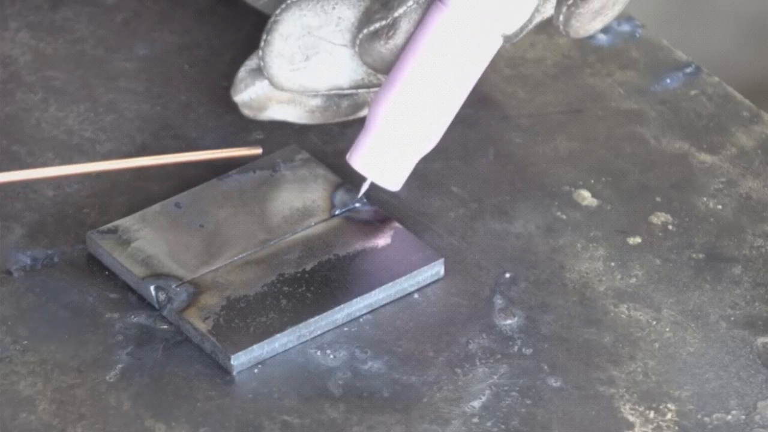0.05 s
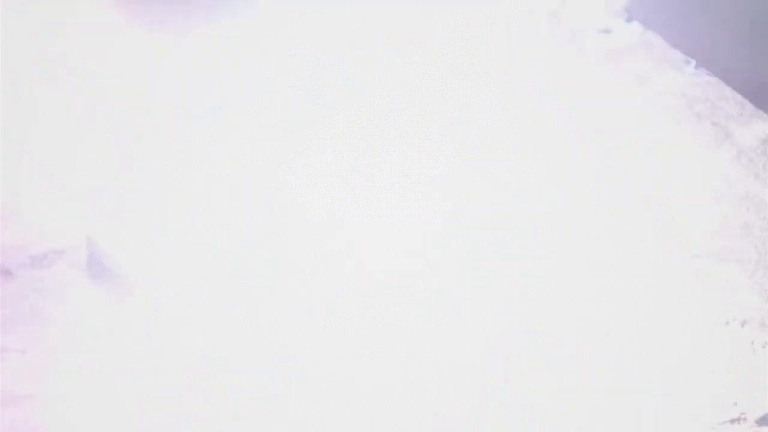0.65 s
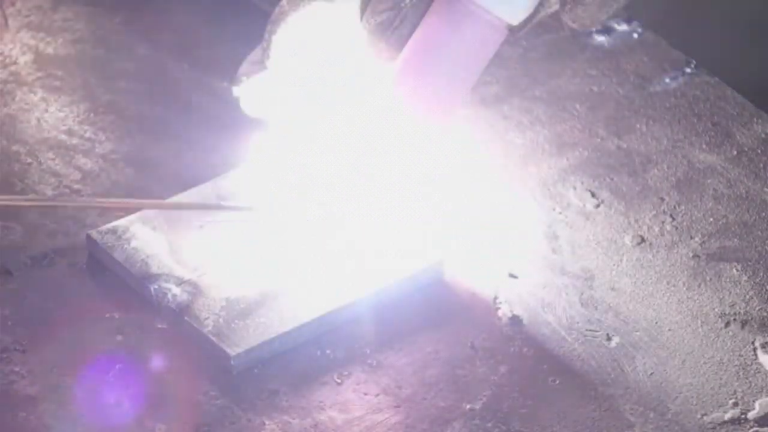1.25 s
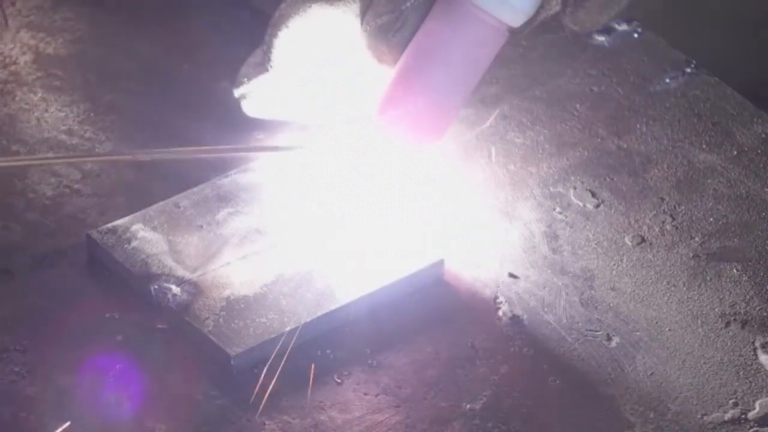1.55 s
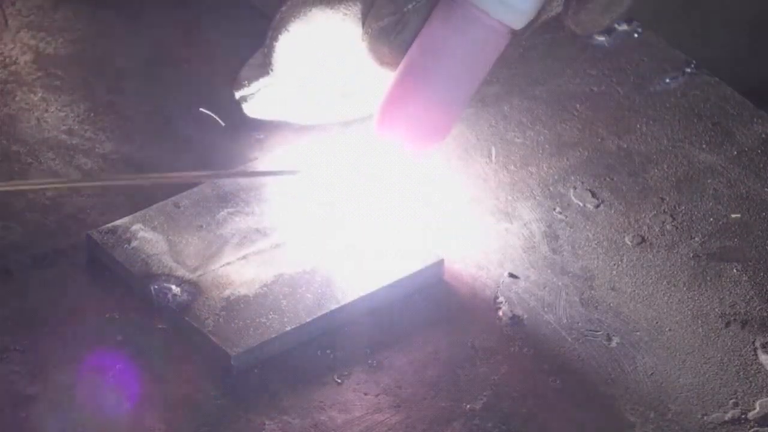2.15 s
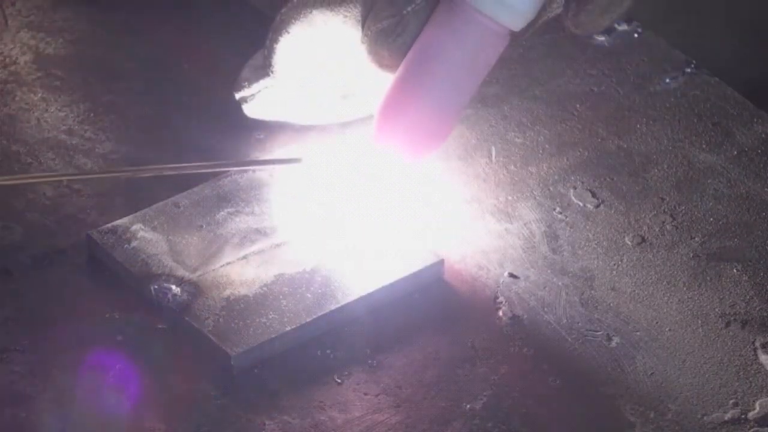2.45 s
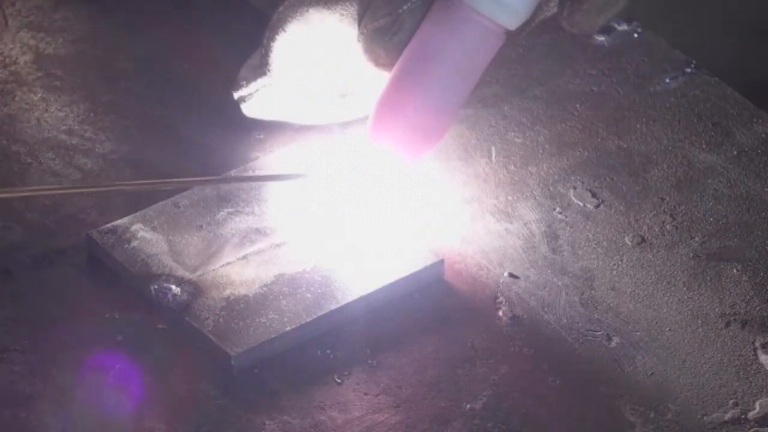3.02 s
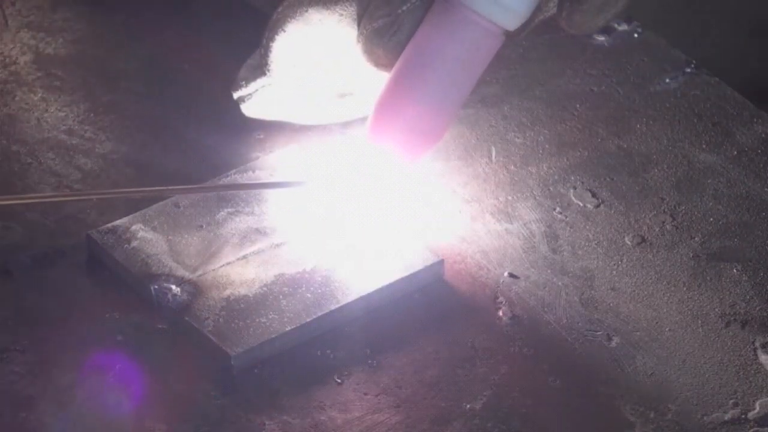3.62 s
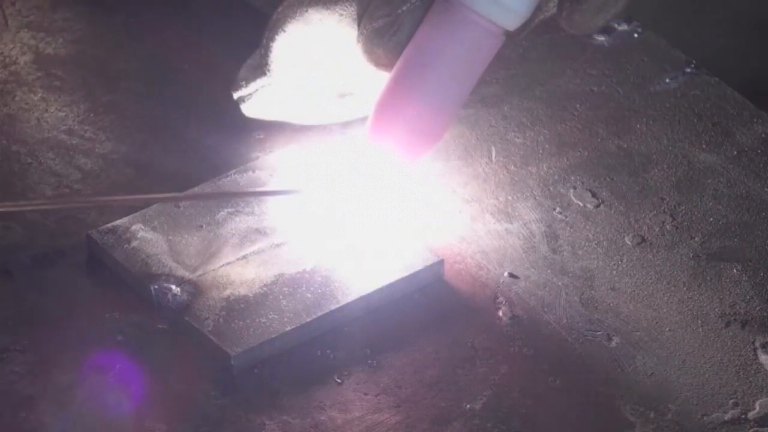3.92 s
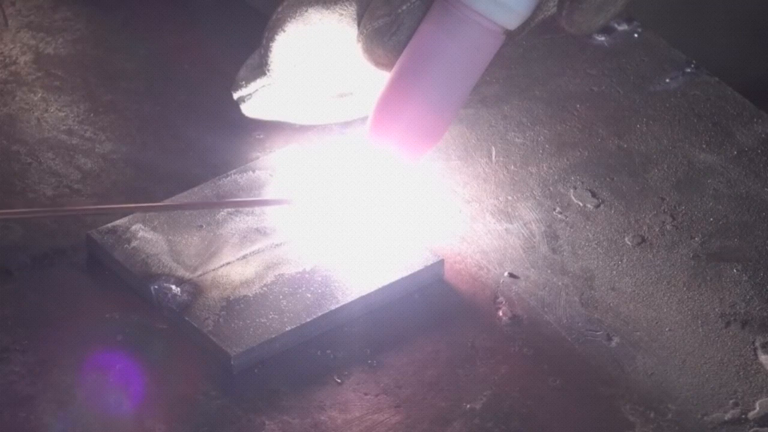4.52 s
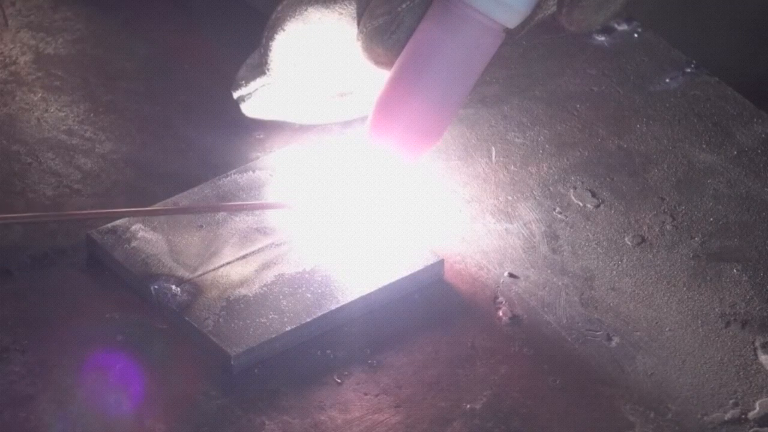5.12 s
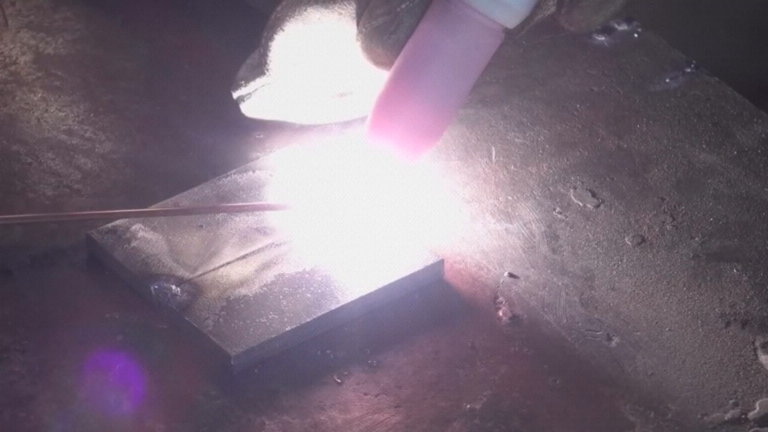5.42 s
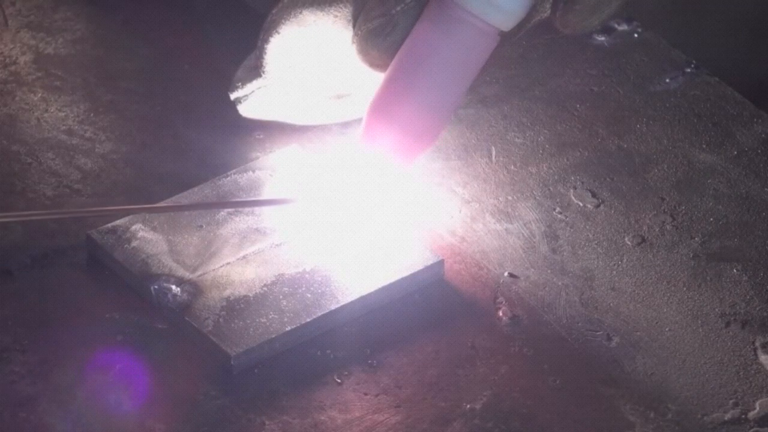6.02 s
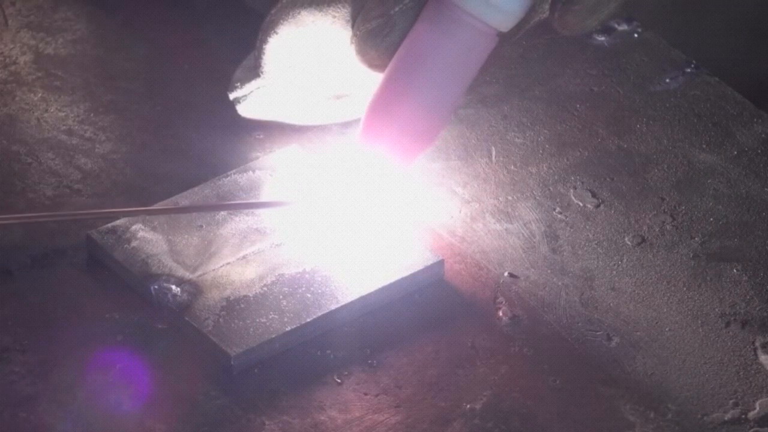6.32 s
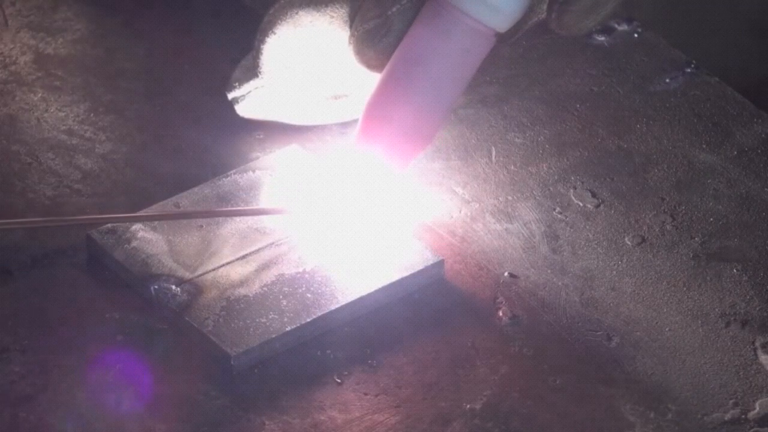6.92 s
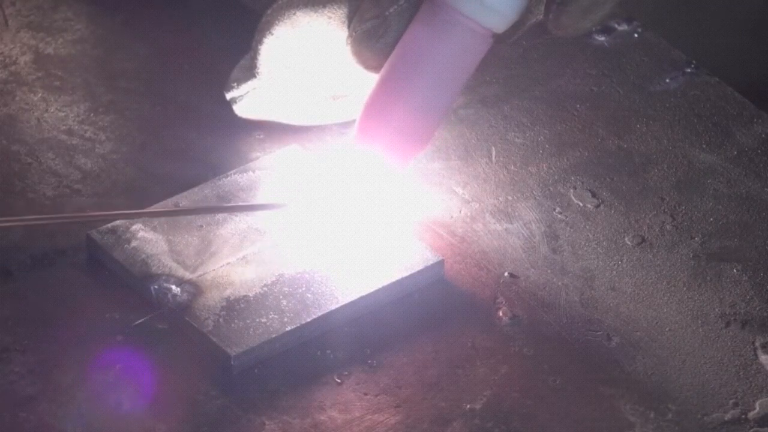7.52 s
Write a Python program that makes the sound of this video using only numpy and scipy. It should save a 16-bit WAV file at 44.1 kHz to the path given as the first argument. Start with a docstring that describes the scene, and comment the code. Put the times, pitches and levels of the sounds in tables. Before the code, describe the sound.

Gas hisses from a welding torch, close to the microphone in a workshop. Two quick, sharp sparks snap and the arc lights on a steel plate with a loud, high, slightly buzzing whine. The melting metal sizzles and spits for a moment. The whine then eases to a steady tone over the continuing hiss, with a few small pops later. The sound is thin and bright, with almost no bass.

```python
"""TIG welding on a steel plate

Shielding gas hisses from the nozzle, close to a microphone that passes almost no bass.
Two sparks snap and the arc lights, singing with the ripple of its power supply. The metal sizzles
and spits while the pool melts, then the arc settles into a steady whine over the hiss."""
import sys
import numpy as np
from scipy import signal
from scipy.fft import rfft, irfft
from scipy.io import wavfile
from scipy.ndimage import uniform_filter1d, minimum_filter1d

SR = 44100
rng = np.random.default_rng(int(sys.argv[2]) if len(sys.argv) > 2 else 0)


def materialize(psi):
    """Save the field psi as 16-bit PCM at rate SR to the path in sys.argv[1].

    A 1-D psi becomes a single channel; in a 2-D psi each row is a channel.
    """
    bounded = np.clip(np.atleast_2d(psi).T, -1, 1)
    quanta = np.round(bounded * 32767).astype(np.int16)
    wavfile.write(sys.argv[1], SR, quanta)


N = 342216
T = np.arange(N) / SR
LIT_S, HARD_UNTIL_S, SETTLE_S, MELTED_S = 0.455, 0.83, 0.73, 1.6

CLOCK_HZ, REST_HZ, RIPPLE_HZ = 6960, 2504, 110
# Each law: settled level in dB, extra dB while the arc burns hard, creep in dB per second.
WHINE_LAW, UPPER_LAW, LOWER_LAW = (-16.5, 7.2, 0), (-27, 8.2, 0.58), (-33.5, -2.5, 0.33)
# The whine drifts with arc length. Each row: time in seconds, pitch in Hz.
WHINE_PITCH = [(0.49, 2496), (0.57, 2526), (1.05, 2514), (2.64, 2497), (3.84, 2505), (6.27, 2504),
               (6.56, 2495), (7.7, 2496)]
# Faint tones of the supply. Each row: frequency at rest in Hz, Hz moved per Hz of whine drift,
# level against the whine in dB, extra dB while the arc burns hard.
SUPPLY_TONES = [(1252, .5, -37, 0), (3456, 0, -26, 0), (5004, 2, -24.5, -8), (5708, -.5, -29, -5),
                (9055, -2.5, -43, 9), (9464, 1, -31.5, 0), (10440, 4.5, -46, 0), (11416, -1, -43, 0),
                (13610, -5, -45, -3)]


def arc_whine(swell_db=21, swell_s=0.078, jitter_hz=5, tremor_hz=3, mix_settle_s=0.38):
    """The arc is a loudspeaker for its current: a whine and difference tones with the switching clock."""
    onset_db = -swell_db * np.clip(1 - (T - LIT_S) / swell_s, 0, 1)
    hand_sway_db = 0.5 * wander(3.5)
    _, dip_db = flares(T)
    shared_db = onset_db - dip_db + hand_sway_db
    level_db = settling(WHINE_LAW, T) + shared_db
    drift_hz = curve(WHINE_PITCH, T) - REST_HZ + jitter_hz * wander(39.2) + tremor_hz * wander(6.16)
    drift_turns = np.cumsum(drift_hz) / SR
    turns = REST_HZ * T + drift_turns
    # Ripple swings loudness and pitch together, so the upper sideband is the stronger.
    ripple = np.exp(2j * np.pi * RIPPLE_HZ * T)
    throb = 1 + amp(-12.5) * ripple + amp(-28) / ripple
    out = amp(level_db + 0.34 * wander(40)) * (throb * np.exp(2j * np.pi * turns)).real
    for harmonic, law, flutter_db, flutter_hz in (1, UPPER_LAW, 1.35, 90), (2, LOWER_LAW, 2.1, 49):
        mix_db = settling(law, T, mix_settle_s) + shared_db + flutter_db * wander(flutter_hz)
        out += amp(mix_db) * np.sin(2 * np.pi * (CLOCK_HZ * T - harmonic * turns))
    for rest_hz, slope, db, hard_db in SUPPLY_TONES:
        tone = np.sin(2 * np.pi * (rest_hz * T + slope * drift_turns + rng.random()))
        out += amp(level_db + db + hard_db * hardness(T)) * tone
    fade_in = np.clip((T - LIT_S) / 0.017, 0, 1)
    return np.sqrt(2) * out * fade_in


def hardness(t, settle_s=SETTLE_S):
    """One while the arc burns hard on the cold plate, relaxing to zero as the pool forms."""
    return np.exp(-np.maximum(t - HARD_UNTIL_S, 0) / settle_s)


def settling(law, t, settle_s=SETTLE_S):
    """A level in dB that follows the hardness of the arc and creeps as the plate heats."""
    settled_db, hard_db, db_per_s = law
    return settled_db + hard_db * hardness(t, settle_s) + db_per_s * t


# Each row: centre in seconds, half length in seconds, extra boil in dB, whine dip in dB (negative lifts).
POOL_FLARES = [(0.655, 0.038, 4.5, 2), (1.0, .03, 2, 0.5), (1.293, 0.072, 4.5, -0.5),
               (1.436, 0.057, 6, 2.5), (1.533, 0.068, 3, -1), (1.67, 0.024, 2.5, 3.5), (1.765, 0.015, 0, 6),
               (1.86, 0.077, 5, 0), (1.998, 0.015, 6, -2), (2.097, 0.061, 3.7, 0.5)]


def flares(t):
    """The melting pool flares up, sizzling and robbing the whine: extra boil and whine dip in dB."""
    centre_s, half_s, boil_db, dip_db = np.transpose(POOL_FLARES)
    bumps = np.exp(-((t[..., None] - centre_s) / half_s) ** 2)
    return bumps @ boil_db, bumps @ dip_db


# Hiss spectrum, and what cold gas or a hard arc adds. Each row: frequency in Hz, relative level in dB.
HISS_COLOUR = [(420, -83), (540, -60), (660, -36.5), (1050, -36), (1350, -20.5), (1900, -17.0), (2700, -1),
               (3500, 0.0), (5000, -4), (6500, -8.5), (8500, -29.5), (9500, -28.5), (15500, -35.5)]
COLD_COLOUR = [(600, -6), (1300, -6.5), (2000, 0.5), (2800, -0.5), (4000, 0), (8000, -4.5), (12000, -0.5),
               (15000, -6)]
FIZZ_COLOUR = [(1500, 1), (5000, -1), (8500, 0.5), (10500, 1.5), (15000, 4)]
# Resonances of the nozzle and its gap to the plate: throughout, before the arc lights, and after.
# Each row: centre in Hz, width in Hz, gain in dB.
NOZZLE_PEAKS = [(805, 46, 2), (4170, 73, -6), (4907, 81, 4.5), (5090, 98, -6.5), (5740, 390, 3),
                (7573, 140, -12.5), (8400, 767, 22.5), (8860, 301, -16), (10000, 190, -5.5),
                (11760, 180, 7), (12853, 105, -23), (13400, 150, 9)]
COLD_PEAKS = [(2680, 60, 4), (3450, 110, -4), (3430, 23, 15), (3650, 43, 8), (3900, 76, 5), (4800, 74, 4),
              (10700, 200, -2)]
HOT_PEAKS = [(3210, 80, 2), (4100, 33, 1), (4810, 26, 4.5), (5660, 33, 3.5), (7000, 98, -5),
             (11680, 69, -8), (11160, 220, -2.5)]
# Resonances rise as the torch warms and moves. Each row: time in seconds, frequency factor.
WARMING_SHIFT = [(0, 0.98), (1.6, 1.004), (2.7, 1.016), (5, 1.02), (7.76, 1.021)]
# Sizzle of the pool. Each row: frequency in Hz, lift in dB per dB of boil.
BOIL_LIFT = [(700, 0.72), (1500, 1.21), (3500, 0.95), (5500, 0.03), (8300, -0.18), (10000, 1.42),
             (15000, -0.1)]


def gas_hiss(calm_boil_db=4.0, sputter_db=0.73, sputter_per_boil=0.11, swell_db=0.77):
    """Turbulent gas through the nozzle's resonances; the boiling pool thickens it and makes it sputter."""
    t = np.arange(N // 256 + 5)[:, None] * 256 / SR
    hz = np.fft.rfftfreq(1024, 1 / SR)
    level_db, boil_db = gas_levels(t)
    shifted_hz = hz / curve(WARMING_SHIFT, t)
    nozzle_db = spectrum(HISS_COLOUR, shifted_hz) + peaks(NOZZLE_PEAKS, shifted_hz)
    sizzle_db = (boil_db - calm_boil_db) * spectrum(BOIL_LIFT, hz)
    cold_db = spectrum(COLD_COLOUR, hz) + peaks(COLD_PEAKS, hz)
    hot_db = peaks(HOT_PEAKS, shifted_hz) + hardness(t) * spectrum(FIZZ_COLOUR, hz)
    gain = amp(nozzle_db + sizzle_db + np.where(t < LIT_S, cold_db, hot_db))
    level_band = (hz > 5200) & (hz < 8700)
    gain *= amp(level_db) / np.linalg.norm(gain[:, level_band], axis=1, keepdims=True)
    spectra = gain * (rng.standard_normal(gain.shape) + 1j * rng.standard_normal(gain.shape))
    hiss = signal.istft(spectra.T, nperseg=1024, noverlap=768)[1][:N]
    excess_boil_db = np.maximum(gas_levels(T)[1] - calm_boil_db, 0) * (T > LIT_S)
    depth_db = sputter_db + sputter_per_boil * excess_boil_db
    hiss *= amp(depth_db * wander(93) + swell_db * wander(37))
    bass_cut = signal.butter(6, 480, "highpass", fs=SR, output="sos")
    return signal.sosfilt(bass_cut, hiss)


# Each law: settled level in dB, extra dB while the arc burns hard, creep in dB per second.
HISS_LAW, BOIL_LAW = (-24.5, -1.34, 0.19), (5.32, 3.2, -0.25)


def gas_levels(t, cold_hiss_db=-26, cold_boil_db=1, sag_s=0.587, sag_db=4.9, fall_s=0.065, rise_s=0.17):
    """Hiss level and boil (strength of the sizzle) in dB; the hiss sags once as the whine comes in."""
    sag = np.where(t < sag_s, np.exp(-((t - sag_s) / fall_s) ** 2), np.exp(-abs(t - sag_s) / rise_s))
    hiss_db = np.where(t < LIT_S, cold_hiss_db, settling(HISS_LAW, t) - sag_db * sag)
    boil_db = np.where(t < LIT_S, cold_boil_db, settling(BOIL_LAW, t) + flares(t)[0])
    return hiss_db, boil_db


# Each row: start in seconds, level in dB, decay in seconds.
IGNITION_SPARKS = [(0.4365, 0.5, 0.001), (0.4423, -3.5, 0.0031)]
# Each row: frequency in Hz, relative level in dB.
SNAP_COLOUR = [(300, -35), (700, -38.5), (1800, -18.5), (3600, -3.5), (6000, -11), (9000, -14),
               (15500, -18.5)]


def sparks():
    """High-voltage snaps jump the gap before the arc holds, loud enough to overload the microphone."""
    envelope = sum(amp(db) * burst(start_s, decay_s) for start_s, db, decay_s in IGNITION_SPARKS)
    return np.clip(colour(rng.standard_normal(N) * envelope, SNAP_COLOUR), -1, 1)


# Each row: start in seconds, relative level in dB.
POOL_SPITS = [(1.3763, -18), (1.4714, -25), (1.5194, -24), (1.6054, -22), (2.05, -16), (5.1212, -25),
              (5.4071, -24), (5.453, -24), (5.5593, -29), (6.4284, -34), (6.8174, -22), (7.1038, -26)]


def spits(pop_db=13, tick_db=-4, decay_s=0.00043, bubbles_per_s=60, crackle_db=3):
    """Bubbles burst in the pool: a few loud pops with a bright tick, and fine crackle while it boils."""
    pop_colour = [(400, -85), (800, -37), (1800, -24), (3600, 11.5), (7000, -25), (15000, -32)]
    tick_colour = [(500, -80), (6000, -12), (10000, 8), (15000, -4)]
    bursts = sum(amp(db) * burst(start_s, decay_s) for start_s, db in POOL_SPITS)
    level_db, boil_db = gas_levels(T)
    bubbles = (rng.random(N) < bubbles_per_s / SR) * (T > MELTED_S) * rng.uniform(-1, 1, N)
    crackle = bubbles * amp(level_db + boil_db + crackle_db)
    pops = amp(pop_db) * bursts * rng.standard_normal(N)
    ticks = amp(tick_db) * bursts * rng.standard_normal(N)
    return colour(pops + crackle, pop_colour) + colour(ticks, tick_colour)


def bench_echoes(x, echo_db=-22):
    """Weak echoes from the bench and nearby surfaces put a fine ripple on the spectrum."""
    delays_s = [.0038, .0072, .0109, .0137, .0151]
    return x + amp(echo_db) * sum(np.pad(x, (round(s * SR), 0))[:N] for s in delays_s)


def amp(db):
    """Decibels to gain."""
    return 10 ** (np.asarray(db) / 20)


def unit(x):
    """Scales to an rms of one."""
    return x / np.sqrt(np.mean(x ** 2) + 1e-20)


def curve(rows, t):
    """Interpolates (seconds, value) rows at the times t."""
    return np.interp(t, *np.transpose(rows))


def spectrum(points, hz):
    """Interpolates (Hz, value) points on a log-frequency axis."""
    point_hz, value = np.transpose(points)
    return np.interp(np.log(hz + 1), np.log(point_hz), value)


def peaks(rows, hz):
    """Bell-shaped peaks and notches, in dB."""
    return sum(db * np.exp(-.5 * ((hz - centre_hz) / width_hz) ** 2) for centre_hz, width_hz, db in rows)


def wander(top_hz):
    """Random motion of rms one, rolling off above top_hz."""
    hz = np.fft.rfftfreq(N, 1 / SR)
    return unit(irfft(rfft(rng.standard_normal(N)) / (1 + (hz / top_hz) ** 2), N))


def colour(x, points):
    """Filters by (Hz, dB) points, keeping the power of white noise."""
    gain = unit(amp(spectrum(points, np.fft.rfftfreq(N, 1 / SR))))
    return irfft(rfft(x) * gain, N)


def burst(start_s, decay_s):
    """Envelope that jumps up and dies away."""
    return (T >= start_s) * np.exp(-np.maximum(T - start_s, 0) / decay_s)


def scene(dip_db=-7):
    """Hiss, spits, sparks and whine; the hiss dips briefly from the first spark until the arc lights."""
    igniting = (T > IGNITION_SPARKS[0][0]) & (T < LIT_S)
    hiss = gas_hiss() * amp(dip_db * uniform_filter1d(igniting * 1., size=60))
    return bench_echoes(hiss + spits()) + sparks() + arc_whine()


def record(dry, top_hz=15780):
    """One microphone on both channels: a fast limiter holds the peaks at full scale, then a low-pass."""
    gain = minimum_filter1d(1 / np.maximum(abs(dry), 1), size=81)
    limited = dry * uniform_filter1d(uniform_filter1d(gain, size=41), size=35)
    lowpass = signal.firwin(511, top_hz, window=("kaiser", 9), fs=SR)
    out = signal.oaconvolve(limited * signal.windows.tukey(N, .0006), lowpass, "same")
    return np.array([out, out])


dry = scene()
out = record(dry)
materialize(out)
```